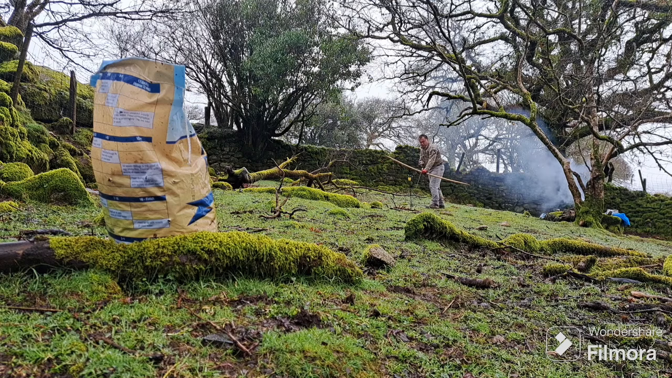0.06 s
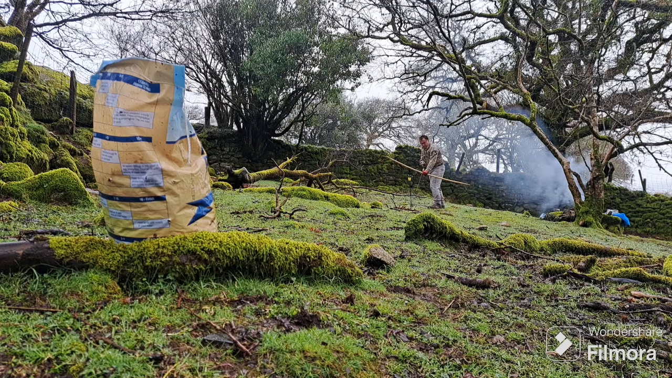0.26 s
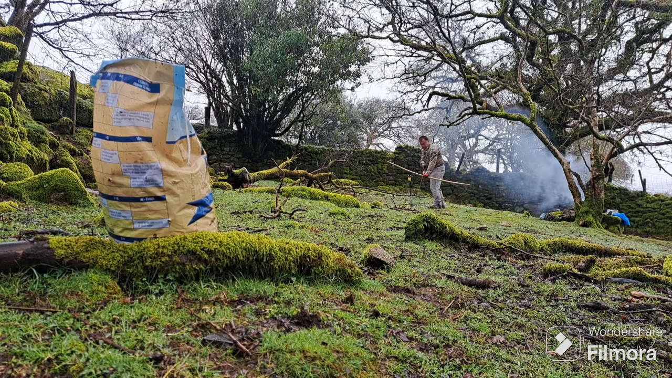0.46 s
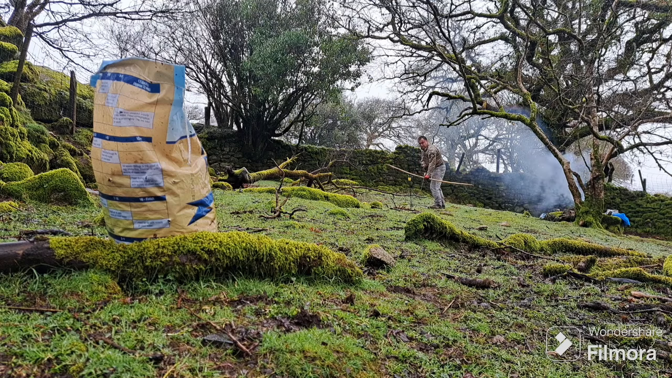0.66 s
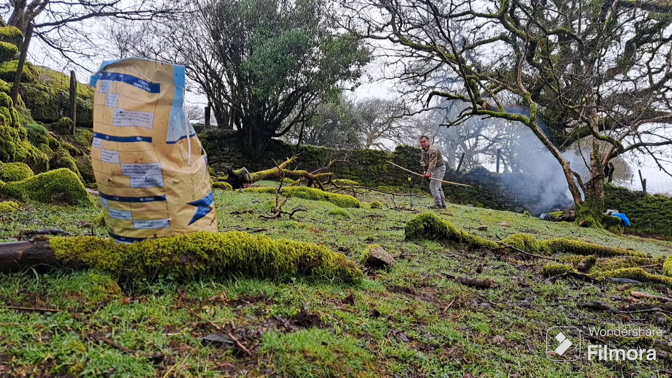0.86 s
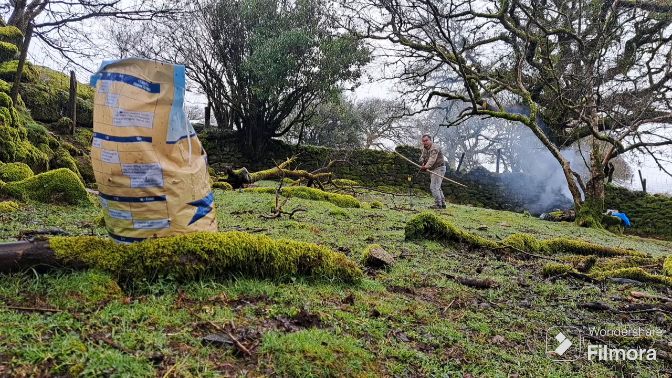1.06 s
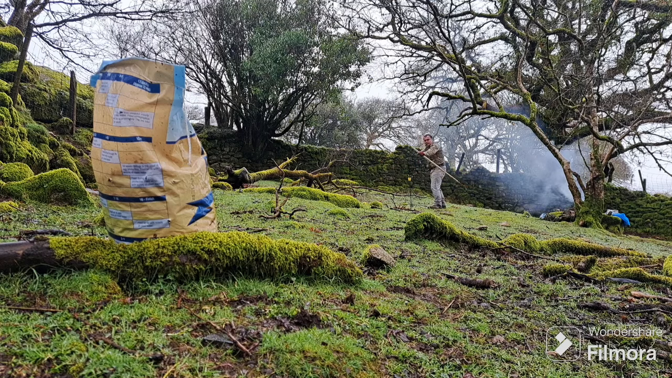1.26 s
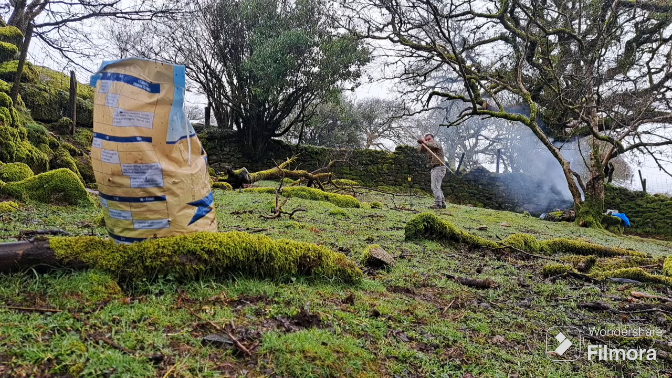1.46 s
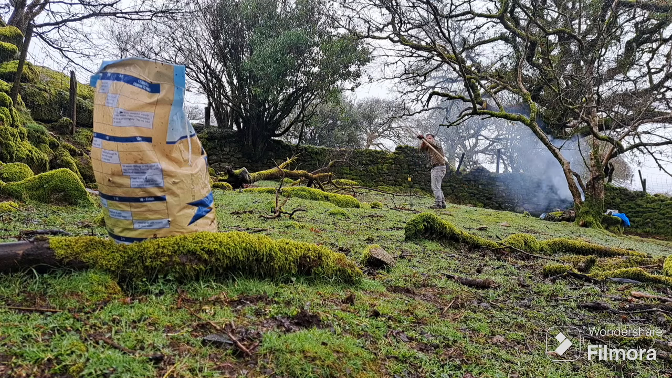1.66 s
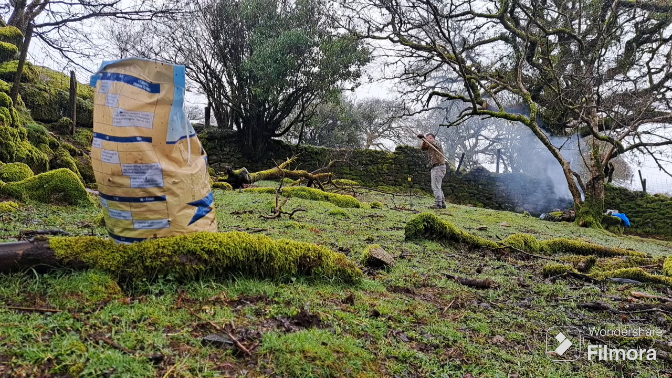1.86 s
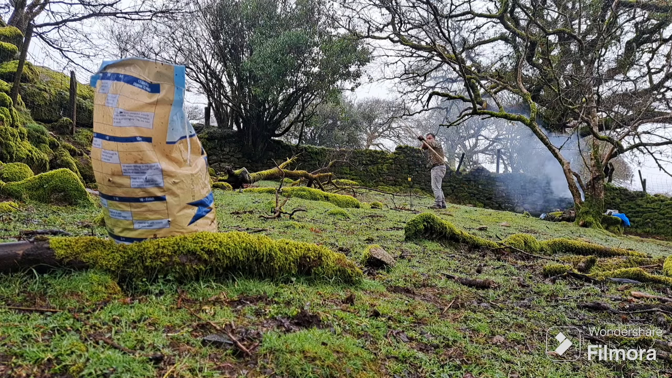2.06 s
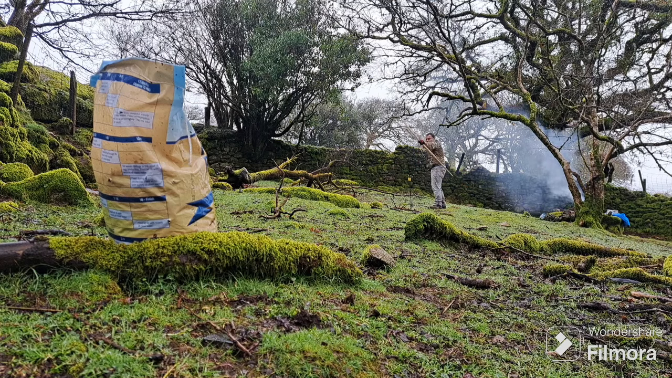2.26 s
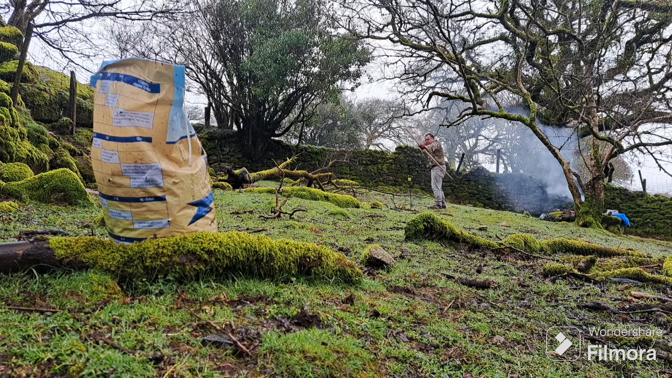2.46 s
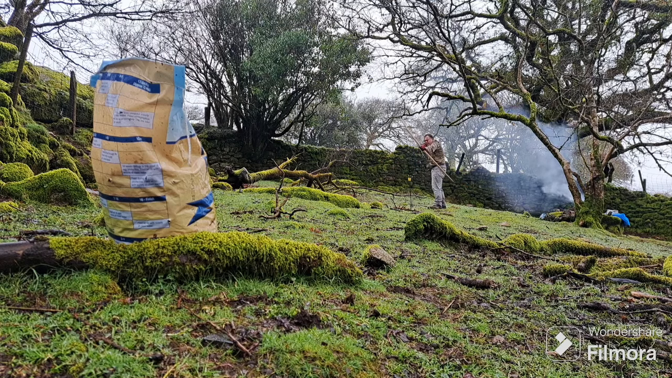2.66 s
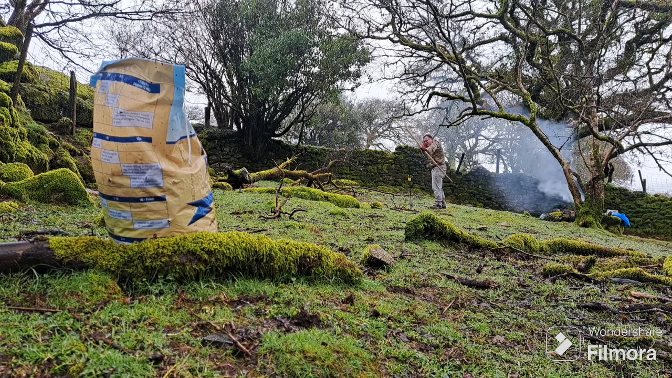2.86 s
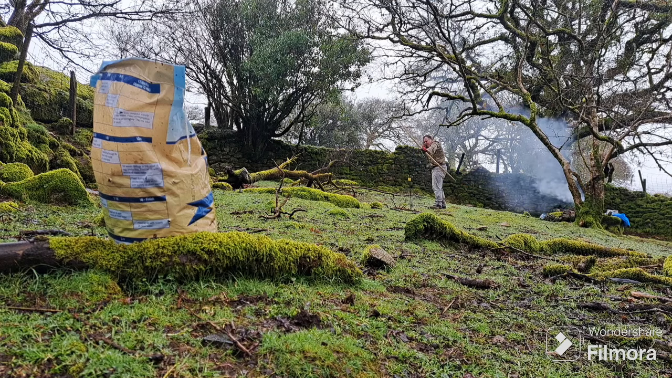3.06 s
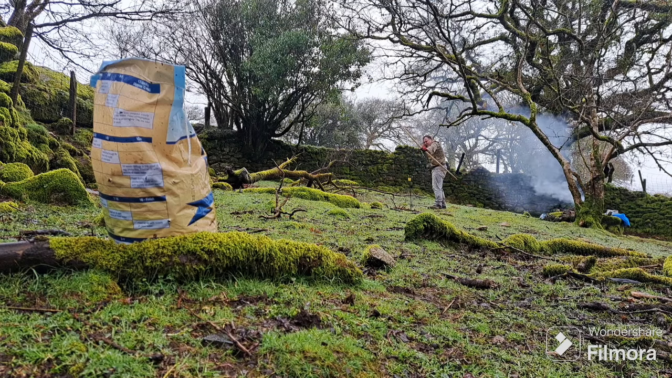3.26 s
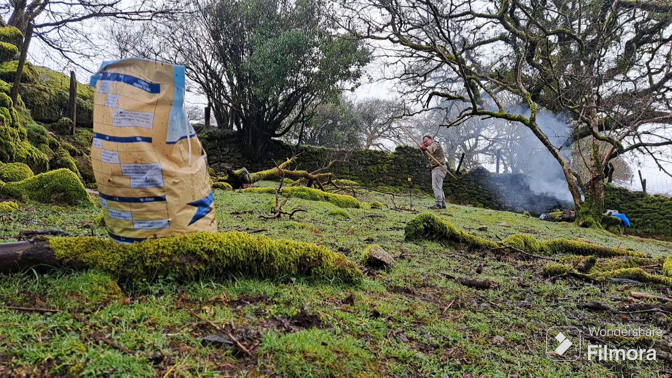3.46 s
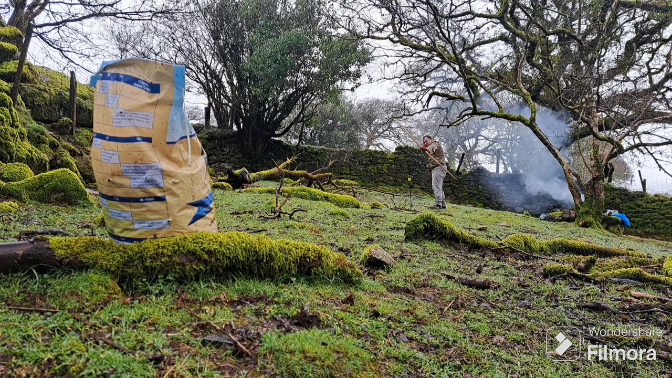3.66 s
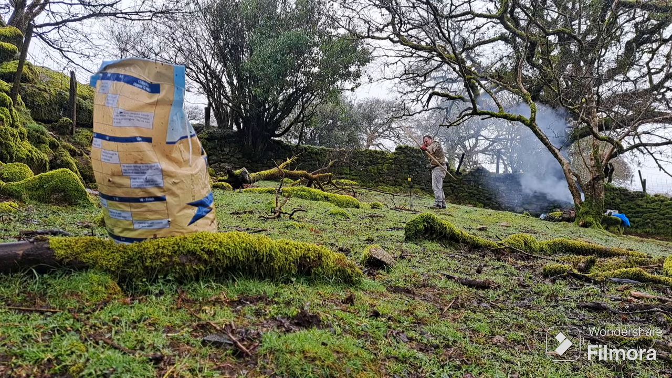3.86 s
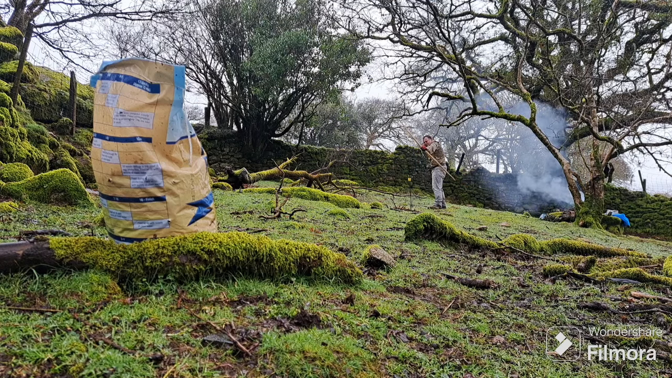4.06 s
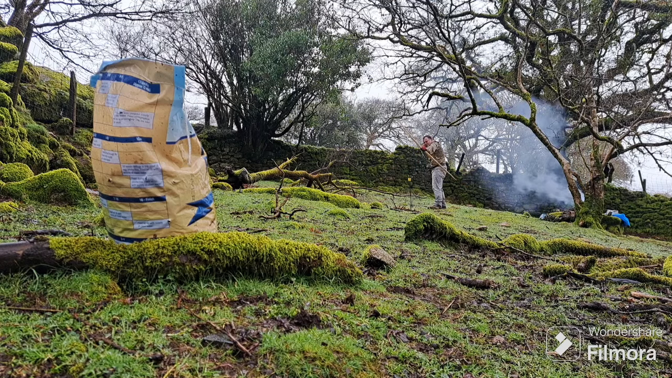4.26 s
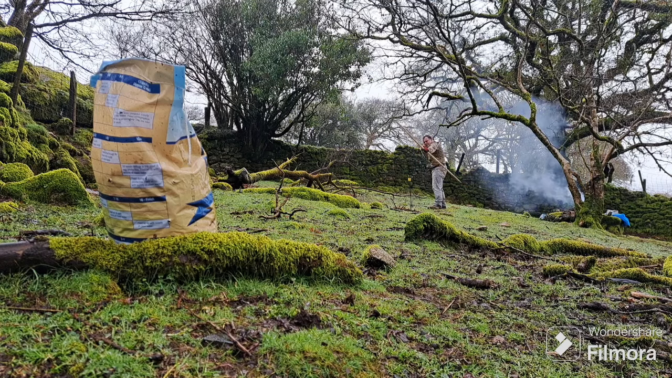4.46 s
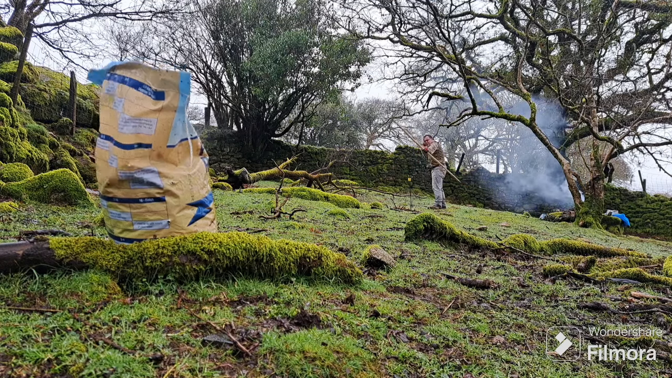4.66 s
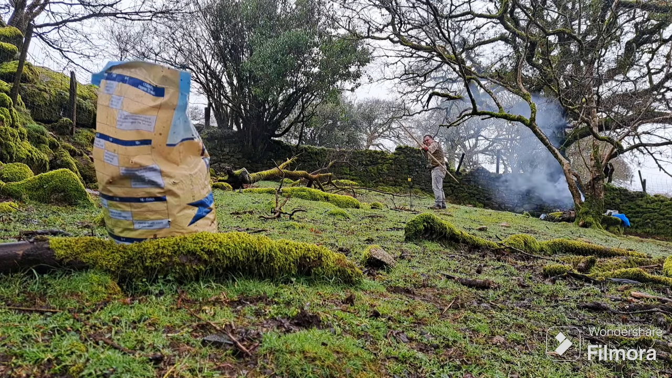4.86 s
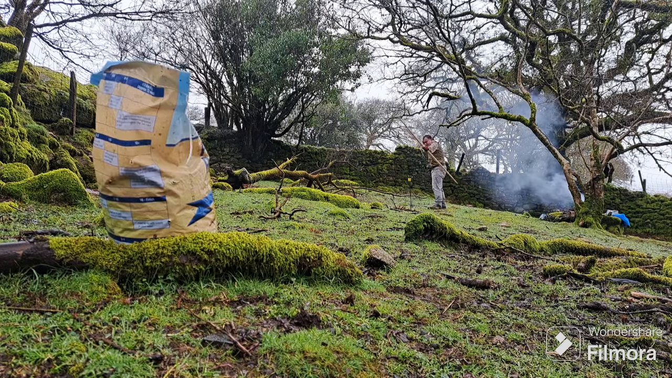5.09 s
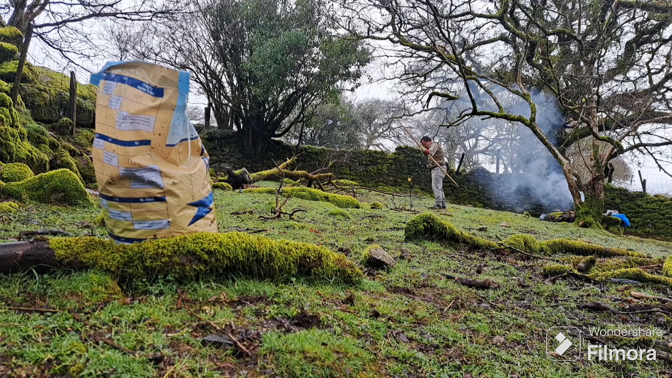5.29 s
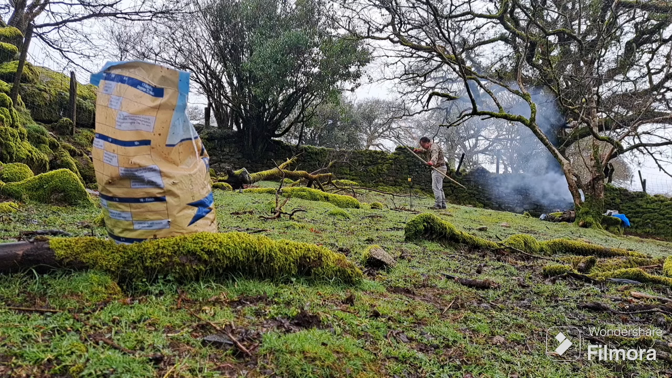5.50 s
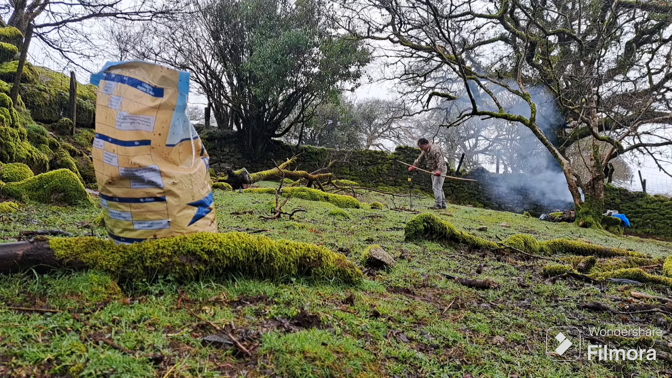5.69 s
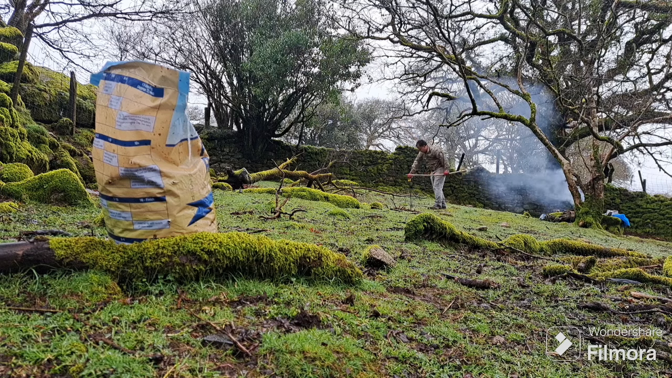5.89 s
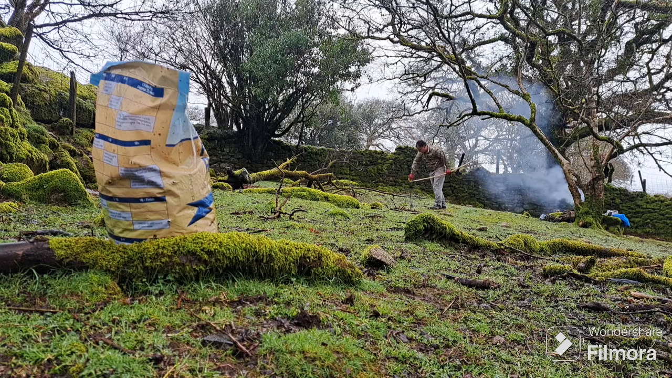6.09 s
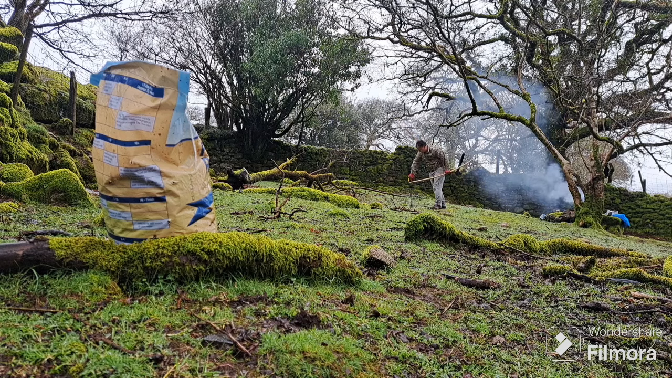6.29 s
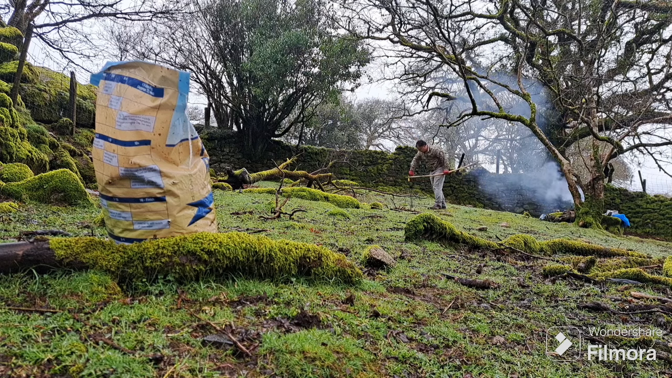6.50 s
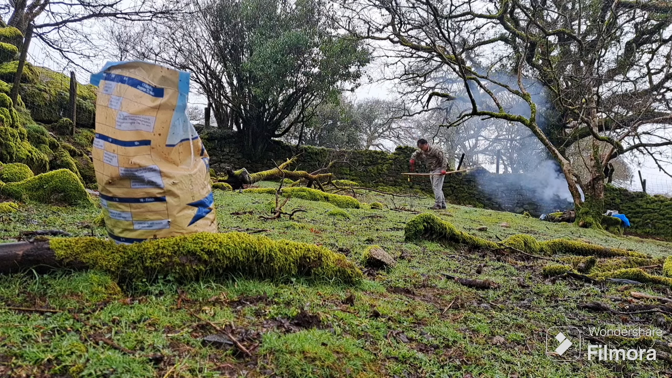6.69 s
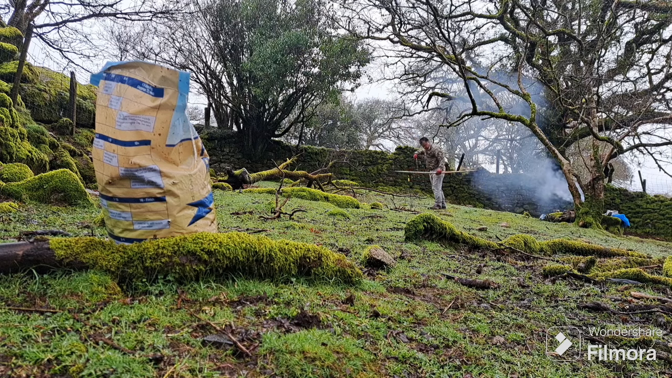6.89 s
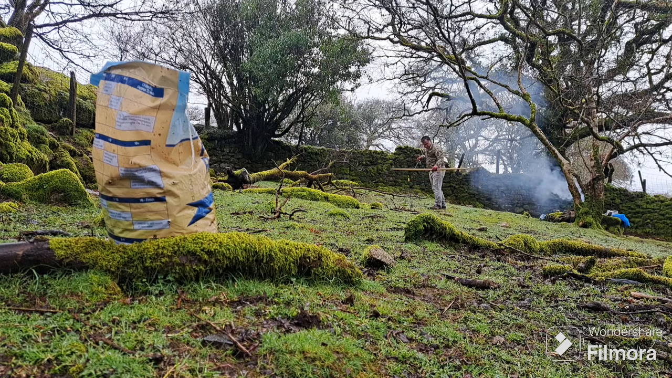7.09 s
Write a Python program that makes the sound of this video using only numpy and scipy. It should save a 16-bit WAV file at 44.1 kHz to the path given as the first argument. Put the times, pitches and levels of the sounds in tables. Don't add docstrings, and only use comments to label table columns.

```python
import sys
import numpy as np
from scipy import signal
from scipy.io import wavfile

SR = 44100
rng = np.random.default_rng(int(sys.argv[2]) if len(sys.argv) > 2 else 0)


def master_out(mix):
    frames = np.transpose(np.atleast_2d(mix))
    ceiling = np.clip(frames, -1, 1)
    pcm = np.round(ceiling * 32767).astype(np.int16)
    wavfile.write(sys.argv[1], SR, pcm)


def natural_amplitude(level_db):
    exponent = np.asarray(level_db, float) / 20
    return 10 ** exponent


N = 314874
T = np.arange(N) / SR

# start_s, push_height (signed), push_hz, push_t60_s, crackle_db
SACK_BLOWS = [(4.7088, 0.42, 2200, 0.01, -12), (4.7094, 0.6, 430, 0.0089, -12),
              (4.7166, 0.42, 950, 0.0022, -11), (4.7174, -0.72, 535, .010, -11.5),
              (4.7334, 0.37, 440, 0.014, -23.5), (4.7369, 0.25, 450, 0.0053, -25.5),
              (4.7423, 0.51, 555, 0.014, -15), (4.7435, -0.24, 200, 0.019, -22),
              (4.7462, .13, 700, .006, -22), (4.7605, .12, 600, 0.011, -28),
              (4.7675, 0.028, 800, .008, -30), (4.7912, -0.35, 546, 0.0085, -15)]
# freq_hz, density_db_per_hz
SACK_CRACKLE = [(530, -36), (900, -8), (2160, -6), (3040, -12.5), (4170, -9.5), (5650, -7.5), (7760, -15.5),
                (8870, -20), (11300, -16), (19000, -26)]
# freq_hz, density_db_per_hz
SACK_BODY = [(24, -35), (40, -14), (80, -27), (160, -4), (523, -1), (1710, -12), (1840, -5.5), (2140, -17),
             (2760, -15.5), (3830, -24), (5310, -26.5), (8570, -31), (11900, -33), (19000, -41)]
# freq_hz, t60_s
SACK_DECAY = [(60, .5), (150, .35), (500, 0.33), (1500, 0.31), (5000, 0.54), (12000, 0.16)]
# start_s, pitch_hz, level_db, t60_s
HEAVES = [
    (4.715, 158, -22.5, 0.043),
    (4.742, 112, -24, 0.14),
    (4.75, 49, -40, 0.47),
    (4.712, 280, -20, 0.077),
    (4.48, 310, -52.5, .15),
    (4.47, 75, -58.5, .2),
]
# start_s, push_height (signed), push_hz, push_t60_s, crackle_db
STRING_BLOWS = [
    (4.4548, 0.0095, 820, 0.03, -39),
    (4.4732, -.012, 604, 0.022, -44),
    (4.4775, 0.0072, 420, 0.027, -50),
    (4.484, -.006, 302, 0.029, -59),
    (4.521, -0.0076, 261, 0.024, -59),
]
# freq_hz, density_db_per_hz
STRING_SLAP = [(530, -25), (900, -8), (1460, -36), (1910, -5.5), (3560, -1), (10800, -51), (15500, -40),
               (16500, -47)]
# freq_hz, density_db_per_hz
BOW_BODY = [(24, -32), (40, -7.5), (172, 2.5), (890, -13.5), (1190, -19), (1540, -10), (3080, -13.5),
            (4400, -19.5), (5330, -16.5), (12000, -31), (15600, -63), (22000, -120)]
# freq_hz, t60_s
BOW_DECAY = [(60, .2), (500, .2), (3000, .26), (12000, .15)]

# start_s, length_s, from_hz, held_hz, level_db
THRUSH_HELD = [(0, 0.068, 3150, 2994, -72.5), (.105, 0.098, 2790, 2930, -70),
               (1.712, .095, 2530, 2653, -63), (1.96, 0.064, 3370, 3127, -58),
               (2.427, 0.059, 2330, 2740, -60), (2.49, 0.069, 2760, 2667, -58),
               (2.575, .15, 2740, 2890, -57), (2.735, 0.033, 3030, 2844, -70),
               (3.236, .154, 2250, 2660, -62.5), (4.04, .02, 2200, 2300, -76),
               (4.054, .093, 2460, 2530, -63), (5.02, .135, 2150, 2624, -67.5),
               (5.158, 0.034, 2803, 3030, -62.5), (5.196, 0.13, 3017, 3220, -63),
               (6.57, .11, 2500, 2540, -82)]
# start_s, length_s, from_hz, to_hz, level_db
THRUSH_GLIDES = [
    (1.815, .1, 2515, 2912, -63),
    (1.92, 0.027, 2930, 3350, -63),
    (3.396, 0.041, 2720, 2906, -62),
    (3.452, .06, 3220, 2700, -61),
    (4.16, .012, 3355, 2910, -72),
    (4.175, .06, 2879, 3250, -63),
    (4.262, .1, 2976, 3490, -68),
]
# start_s, length_s, from_hz, held_hz, level_db
WARBLER_HELD = [(1.405, .022, 4050, 3810, -70), (1.43, 0.088, 3950, 4850, -68),
                (1.518, .03, 4430, 4700, -69), (1.54, 0.05, 5000, 5500, -67.5),
                (1.552, .02, 5100, 5300, -66), (1.59, .085, 5610, 5750, -69),
                (1.57, 0.033, 4390, 4200, -66.5), (1.62, .06, 5900, 6200, -81),
                (1.653, .014, 3850, 4000, -67), (1.665, 0.06, 4290, 4850, -63.5),
                (1.69, .08, 5200, 5350, -68), (1.75, .025, 3830, 3830, -65),
                (1.772, .05, 4140, 4680, -57.5), (1.845, .055, 4600, 4760, -66),
                (1.875, .1, 5300, 5750, -68.5), (1.87, .025, 4070, 3770, -67),
                (1.98, 0.077, 4650, 4740, -70)]
# start_s, length_s, from_hz, to_hz, level_db
WARBLER_GLIDES = [
    (2.085, 0.051, 5700, 4505, -56.5),
    (2.14, 0.027, 4700, 3830, -57.5),
    (2.15, 0.025, 5300, 5160, -61),
]
# offset_s, pitch_hz, level_db
FLOURISH_SHAPE = [
    (0, 6450, -61),
    (.008, 6200, -56),
    (.018, 6000, -56),
    (.023, 5400, -65),
    (.028, 4700, -55),
    (.06, 4150, -53),
    (.076, 3880, -54),
    (.092, 3650, -55),
    (.1, 3500, -66),
]
# start_s, level_db, stretch
FLOURISH_STARTS = [
    (2.226, 0, 0.99),
    (2.389, -2.5, 1.05),
    (2.576, -5, 1.01),
]
# offset_s, pitch_hz, level_db
TRILL_SHAPE = [
    (0, 3650, -68),
    (.005, 4550, -68),
    (.01, 4750, -74),
    (.015, 4400, -68),
    (.022, 3850, -69),
    (.032, 3000, -78),
]
# start_s, level_db
TRILL_STARTS = [
    (.517, -1.5),
    (.583, -1),
    (.648, -.5),
    (.709, 1.5),
    (.773, 0),
    (.839, 1),
    (.911, 2),
    (.983, 1.5),
]
# start_s, length_s, from_hz, lowest_hz, level_db
BUZZ_NOTES = [
    (1.295, 0.13, 8700, 8050, -69.5),
    (1.49, 0.12, 8500, 8040, -70),
    (1.655, 0.12, 8680, 7690, -63),
    (1.835, 0.13, 8700, 7460, -64.5),
    (6.42, 0.142, 8670, 7950, -70),
    (6.635, 0.12, 7500, 7800, -70.5),
    (6.79, 0.14, 8080, 7670, -69.5),
]
# start_s, length_s, from_hz, to_hz, level_db
CHATTER_NOTES = [
    (5.9, .14, 5010, 5200, -84),
    (6.54, .15, 5300, 4000, -72.5),
    (6.66, .08, 2650, 3200, -71.5),
    (6.7, .08, 4500, 4300, -77),
    (6.93, .1, 4700, 4500, -78),
]
# start_s, length_s, from_hz, to_hz, level_db
FAR_NOTES = [(.02, .16, 7900, 7350, -82), (.058, .018, 5900, 4950, -78), (.074, .03, 4950, 4700, -78),
             (.4, .018, 5800, 5100, -83), (.416, .028, 5100, 4850, -81), (.674, .035, 7900, 8250, -77),
             (1.08, .24, 4310, 4280, -75.5), (1.09, .11, 7330, 8800, -79.5), (1.98, .1, 2156, 2104, -80.5),
             (2.7, .086, 2155, 2120, -76), (4.27, .07, 4950, 4900, -89), (4.34, .11, 4900, 4700, -84),
             (4.5, .09, 4680, 4850, -78), (4.64, .075, 4780, 4570, -79), (4.97, .09, 4800, 4850, -88),
             (5.78, .05, 4970, 4870, -86), (5.86, .06, 2050, 1900, -84), (6.03, .09, 2180, 2150, -79),
             (6.12, .07, 2300, 2340, -78), (6.157, .04, 4830, 4880, -75), (6.17, .09, 5900, 5900, -77),
             (6.25, .11, 7700, 8420, -84), (6.34, .17, 1830, 2040, -82), (6.55, .085, 4250, 4280, -80),
             (6.56, .02, 5250, 5100, -75), (6.69, .03, 2750, 3200, -77), (6.72, .05, 3250, 3250, -83),
             (6.945, .04, 1950, 2100, -81), (6.97, .06, 4500, 4440, -81), (6.99, .14, 2200, 2260, -76),
             (7.09, .05, 4800, 4700, -82)]

# start_s, peak_db, centre_hz, left_minus_right_db
FIRE_SPITS = [(0.0381, -45.5, 11200, 9.5), (0.338, -46.5, 9000, -7), (.749, -57.5, 7000, -0.2),
              (0.831, -46.5, 8000, -2), (.924, -57, 9000, 1), (1.604, -55, 7000, .1),
              (1.909, -58, 8000, -4), (2.311, -57, 9000, 5), (2.547, -57, 9000, 1.5),
              (2.553, -56, 11000, 1.5), (2.561, -57, 12000, 3), (2.931, -55.5, 5300, -3),
              (4.015, -56, 7000, -1), (4.66, -60, 6000, 2), (5.902, -54, 10000, -3),
              (1.0041, -60, 12500, -7), (1.312, -52, 7930, 2.5), (1.473, -50.5, 8160, 5.5),
              (1.718, -48, 5160, 3), (1.9774, -54, 5300, 2), (2.54, -49.5, 11000, 3.5),
              (2.596, -50, 10000, 4.5), (2.8925, -35, 12000, -5.5), (2.893, -41, 7000, -6),
              (3.9774, -49.5, 9000, -6), (3.9765, -54, 3600, -5.5), (4.0435, -50, 11800, 9.5),
              (4.235, -52.5, 10600, 6.5), (4.5122, -45, 5190, 8), (4.603, -56, 9000, 7),
              (5.3254, -52, 5260, -0.5), (5.4506, -44, 6500, 10), (5.7066, -54, 8000, 2.5),
              (5.921, -41, 7300, 0.1), (6.151, -45.5, 7960, 2.5), (6.2217, -55.5, 5910, 10.5),
              (6.5796, -41.5, 8400, 8.5), (6.5984, -53, 7000, 1.5), (7.0482, -45.5, 8300, 1)]
# start_s, peak_db, centre_hz
FIRE_POPS = [
    (1.473, -60.5, 910),
    (1.718, -51.5, 1590),
    (2.8917, -54, 1900),
    (4.043, -56, 2190),
    (4.232, -62.5, 1050),
    (5.325, -64.5, 1050),
    (6.148, -62, 2080),
    (6.22, -61, 989),
    (7.097, -59, 585.7),
]

# time_s, level_db
AIR_LEVEL = [
    (0, 0.5),
    (4.4, -0.55),
    (4.44, 4),
    (5.0, -1.5),
    (5.42, -5.5),
    (7.14, 1.5),
]
# centre_s, rise_db, half_width_s
RUMBLE_GUSTS = [
    (.7, 3.5, .4),
    (1.5, 5, 0.48),
    (2.4, 6.5, 0.11),
    (3.47, 19.5, 0.11),
    (3.78, 13, .25),
    (6.55, 8, 0.33),
    (7.14, 1, 0.31),
]
# freq_hz, density_db_per_hz
RUMBLE_SPECTRUM = [(15, -39), (25, -10), (38, -2.5), (59, 3.5), (102, -12.5), (200, -20), (260, -47),
                   (440, -120)]
# freq_hz, density_db_per_hz
MURMUR_SPECTRUM = [(53, -29.5), (90, -3), (278, -8), (393, -10.5), (467, -12), (1200, -22.5), (1560, -55),
                   (2640, -120)]
# freq_hz, density_db_per_hz
HISS_SPECTRUM = [(410, -30.5), (700, 0), (1300, -5), (1550, 0.5), (2810, -5), (3470, -2.5), (4890, -2),
                 (6710, -4.5), (10300, -3.5), (15000, -19.5), (16500, -26)]
# freq_hz, left_right_likeness
AIR_LIKENESS = [(60, 0.94), (250, 0.99), (700, 0.4), (2000, 0.16), (6000, 0.03), (15000, 0.034)]


def rms_one(x):
    return x / np.sqrt(np.mean(x ** 2) + 1e-30)


def at_hz(points, hz):
    table = np.array(points)
    return np.interp(np.log(hz), np.log(table[:, 0]), table[:, 1])


def drift(rate_hz, size):
    knots = rng.standard_normal(int(size / SR * 400) + 3)
    position = np.arange(size) * (np.clip(rate_hz, .1, 399) / SR)
    return np.interp(position, np.arange(len(knots)), knots) * 1.22


def bands(spectrum, size, shape):
    white, out = rng.standard_normal((2, 2, size)), 0
    edges_hz = 25 * 2 ** np.arange(0, 9.6, .5)
    for k, (low, high) in enumerate(zip(edges_hz, edges_hz[1:])):
        hz = np.sqrt(low * high)
        if spectrum[0][0] < hz < spectrum[-1][0]:
            sos = signal.butter(2, [low, high], "band", fs=SR, output="sos")
            pair = signal.sosfilt(sos, white[k % 2])
            out = out + natural_amplitude(at_hz(spectrum, hz)) * shape(hz, pair)
    return out


def tilt(left_db, right_db):
    return natural_amplitude(np.array([[left_db], [right_db]]))


def delay_sides(left, right, lag):
    return np.array([np.roll(left, max(lag, 0)), np.roll(right, max(-lag, 0))])


def place(x, lag, pan_db):
    return delay_sides(x, x, lag) * tilt(pan_db / 2, -pan_db / 2)


def add(out, start_s, x):
    i = int(start_s * SR)
    out[..., i:i + x.shape[-1]] += x[..., :N - i]


def strike(blows, crackle, body, body_t60, body_db, lag, alike, snap_t60, snap_grows, snap_pan_db):
    size = SR // 2
    t = np.arange(size) / SR
    out = np.zeros((2, N))

    rasp = rms_one(bands(crackle, size, lambda hz, pair: pair))
    uneven_db = 2.8 * rng.standard_normal(size // 16 + 1).repeat(16)[:size]
    rasp = rasp * natural_amplitude(uneven_db)
    rasp = np.sqrt(alike) * rasp[0] + np.sqrt(1 - alike) * np.array([rasp[1], rasp[1][::-1]])

    dying = bands(body, size, lambda hz, pair: pair * natural_amplitude(-60 * t / at_hz(body_t60, hz)))
    dying = dying / np.sqrt(np.mean(dying[:, :SR // 50] ** 2)) * np.clip(t / .004, 0, 1)
    dying = dying[0] + np.diff(dying[1], prepend=0) * [[1.5], [-1.5]]

    push_low_cut = signal.butter(2, 130, "high", fs=SR, output="sos")
    for k, (start_s, height, hz, t60, snap_db) in enumerate(blows):
        push = height * np.sin(2 * np.pi * hz * t) * natural_amplitude(-60 * t / t60)
        push = signal.sosfilt(push_low_cut, push)
        decay_s = min(snap_t60 + snap_grows * (start_s - blows[0][0]), 1.9 * snap_t60)
        snaps = np.roll(rasp, -2000 * k, 1) * natural_amplitude(snap_db - 60 * t / decay_s) * np.clip(t / 0.00022, 0, 1)
        snaps = snaps * tilt(snap_pan_db, -snap_pan_db)
        add(out, start_s, push + snaps + abs(height) * natural_amplitude(body_db) * dying)
    return delay_sides(out[0], out[1], lag)


def arrow_in_sack():
    hit = strike(SACK_BLOWS, SACK_CRACKLE, SACK_BODY, SACK_DECAY, body_db=-26, lag=-7.5, alike=0.55,
                 snap_t60=.012, snap_grows=.45, snap_pan_db=1.94)
    return hit * tilt(-.4, .4)


def heaves():
    out, t = np.zeros(N), np.arange(SR // 2) / SR
    for start_s, hz, db, t60 in HEAVES:
        rise = np.clip(t / 0.0037, 0, 1)
        add(out, start_s, natural_amplitude(db - 60 * t / t60) * rise * np.sin(2 * np.pi * hz * t))
    return out


def string_on_bow():
    return strike(STRING_BLOWS, STRING_SLAP, BOW_BODY, BOW_DECAY, body_db=-14.5, lag=4, alike=0.8,
                  snap_t60=0.023, snap_grows=0.011, snap_pan_db=0.0)


def holds(rows, slur_s, slur_hz_per_s, creep_hz_per_s, lead_db_per_khz, tail_db):
    notes = []
    for s, length, hz0, hz1, db in rows:
        leap_hz = abs(hz1 - hz0)
        slur = min(slur_s + leap_hz / slur_hz_per_s, .9 * length)
        lead_db = lead_db_per_khz * leap_hz / 1000
        notes.append([(s, hz0, db + lead_db),
                      (s + .4 * slur, hz0 + 0.66 * (hz1 - hz0), db + .3 * lead_db),
                      (s + slur, hz1, db),
                      (s + length, hz1 + creep_hz_per_s * (length - slur), db + tail_db)])
    return notes


def slides(rows, lead_db, tail_db):
    return [[(s, hz0, db + lead_db), (s + length / 2, (hz0 + hz1) / 2, db), (s + length, hz1, db + tail_db)]
            for s, length, hz0, hz1, db in rows]


def legato(notes):
    notes = sorted(notes)
    phrases = [notes[0]]
    for note in notes[1:]:
        if 0 <= note[0][0] - phrases[-1][-1][0] < .015:
            phrases[-1] = phrases[-1] + note
        else:
            phrases.append(note)
    return phrases


def whistle(notes, wobble, flutter_db, rough):
    out = np.zeros(N)
    for note in notes:
        s, hz, db = np.transpose(note)
        t = np.arange(s[0], s[-1], 1 / SR)
        pitch_hz = np.interp(t, s, hz) * (1 + wobble * drift(50, len(t)) + rough * drift(350, len(t)))
        fade = np.clip(np.minimum(t - s[0], s[-1] - t) / 0.003, 0, 1)
        level = natural_amplitude(np.interp(t, s, db) + 6.0 + flutter_db * drift(60, len(t)))
        add(out, s[0], fade * level * np.sin(2 * np.pi * np.cumsum(pitch_hz) / SR))
    return out


def thrush():
    held = holds(THRUSH_HELD, .02, 18000, 200, -21, -3)
    notes = legato(held + slides(THRUSH_GLIDES, -1.5, -2.5))
    return whistle(notes, wobble=.009, flutter_db=3.0, rough=.008)


def warbler():
    notes = holds(WARBLER_HELD, 0.0061, 61000, 1220, -2.5, -9.5) + slides(WARBLER_GLIDES, -2.2, -7.5)
    return whistle(notes, wobble=.008, flutter_db=3, rough=.022)


def flourish():
    notes = [[(start_s + s * stretch, hz, db + level_db) for s, hz, db in FLOURISH_SHAPE]
             for start_s, level_db, stretch in FLOURISH_STARTS]
    song = whistle(notes, wobble=.006, flutter_db=2.5, rough=.012)
    return song + natural_amplitude(-9.5) * np.roll(song, int(.029 * SR))


def trill():
    notes = [[(start_s + s, hz * (.97 + k * .006), db + level_db) for s, hz, db in TRILL_SHAPE]
             for k, (start_s, level_db) in enumerate(TRILL_STARTS)]
    return whistle(notes, wobble=.01, flutter_db=3, rough=.06)


def buzz():
    notes = holds(BUZZ_NOTES, 0.0121, 79000, 4010, -10, -4.0)
    return whistle(notes, wobble=0.004, flutter_db=1.5, rough=0.0275)


def wood(x, wet_db):
    t60_s, high_t60_s, split_hz = .7, 0.5, 3710
    t = np.arange(SR) / SR
    white = rng.standard_normal((2, SR))
    low = signal.sosfilt(signal.butter(4, split_hz, fs=SR, output="sos"), white)
    tail = low * natural_amplitude(-60 * t / t60_s) + (white - low) * natural_amplitude(-60 * t / high_t60_s)
    tail = tail * np.clip(t / 0.022, 0, 1) / np.sqrt(SR * .04)
    return natural_amplitude(wet_db) * signal.fftconvolve(x[None], tail, axes=1)[:, :N]


def birds():
    mellow, near, quick, rattle, high = thrush(), warbler(), flourish(), trill(), buzz()
    chatter = whistle(slides(CHATTER_NOTES, -2, -6), wobble=.02, flutter_db=4, rough=.08)
    far = whistle(slides(FAR_NOTES, -1.3, -4), wobble=.006, flutter_db=4, rough=.015)

    direct = place(mellow, 18.7, -4.5) + place(near + quick + natural_amplitude(1.2) * rattle, 20, -2.7)
    direct = direct + place(far, 16, -2.3) + place(high, 10, -5.5)

    scattered = natural_amplitude(0.4) * mellow + near + natural_amplitude(-3.5) * quick + natural_amplitude(1.5) * rattle
    scattered = scattered + chatter + natural_amplitude(0.5) * far + natural_amplitude(-3.5) * high

    late = natural_amplitude(-12) * np.roll(mellow, int(.047 * SR)) + natural_amplitude(-14) * np.roll(mellow + near, int(.083 * SR))
    return direct + wood(scattered, wet_db=4.0) * tilt(-1.5, 1.5) + place(late, 18, -5.5)


def fire():
    out, t = np.zeros((2, N)), np.arange(SR // 50) / SR
    # start_s, peak_db, centre_hz, pan_db, t60_s, band_ratio
    rows = [(s, db, hz, pan_db, .006, 1.9) for s, db, hz, pan_db in FIRE_SPITS]
    rows = rows + [(s, db - 2.5, hz, -1.5, .012, 1.5) for s, db, hz in FIRE_POPS]
    for s, db, hz, pan_db, t60, ratio in rows:
        noise = rng.standard_normal(len(t))
        burst = (noise + 6.5 * (t == 0)) * natural_amplitude(-60 * t / t60)
        sos = signal.butter(2, [hz / ratio, min(hz * ratio, .45 * SR)], "band", fs=SR, output="sos")
        tick = signal.sosfilt(sos, burst)
        tick = np.pad(tick, (0, 20)) / np.abs(tick).max() * natural_amplitude(db + 9.5)
        lag = int(np.clip(8 - 2.5 * pan_db, -20, 20))
        add(out, s, place(tick, lag, pan_db))
    return out


def air():
    air_level_db = np.interp(T, *np.transpose(AIR_LEVEL))
    gust_db = sum(db * np.clip(1 - abs(T - s) / width, 0, 1) for s, db, width in RUMBLE_GUSTS)
    together = drift(6.8, N)

    def layer(spectrum, patchy_db):
        def shape(hz, pair):
            alike = np.clip(at_hz(AIR_LIKENESS, hz), 0, 1)
            shared, own = np.sqrt(alike) * pair[0], np.sqrt(1 - alike) * pair[1]
            sides = np.array([np.roll(shared, 20) + own, shared + own[::-1]])
            return sides * natural_amplitude(patchy_db * (.5 * together + drift(10, N)))
        return rms_one(bands(spectrum, N, shape))

    rumble = natural_amplitude(-76.5 + gust_db + .9 * air_level_db) * layer(RUMBLE_SPECTRUM, patchy_db=0.3)
    murmur = natural_amplitude(-74.5 + 0.81 * air_level_db) * layer(MURMUR_SPECTRUM, patchy_db=2.5)
    hiss = natural_amplitude(-70 + air_level_db) * layer(HISS_SPECTRUM, patchy_db=0.4)
    return rumble + murmur + hiss * tilt(-.3, .3)


def scene():
    return arrow_in_sack() + heaves() + string_on_bow() + birds() + fire() + air()


def roll_off(x):
    return signal.sosfilt(signal.butter(12, 17130, fs=SR, output="sos"), x)


def record(dry):
    rounded = 1.1 * np.tanh(dry / 1.1)
    mix = signal.sosfilt(signal.cheby2(10, 60, 17000, fs=SR, output="sos"), rounded)
    mix = signal.sosfilt(signal.butter(4, 33, "high", fs=SR, output="sos"), mix)
    return roll_off(mix)


dry = scene()
out = record(dry)
master_out(out)
```